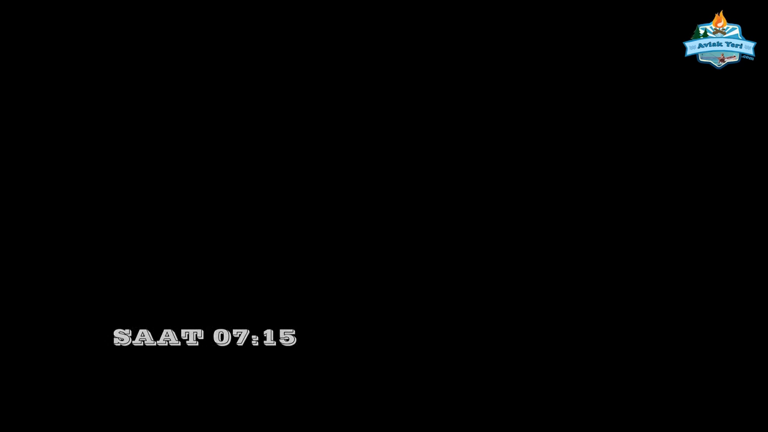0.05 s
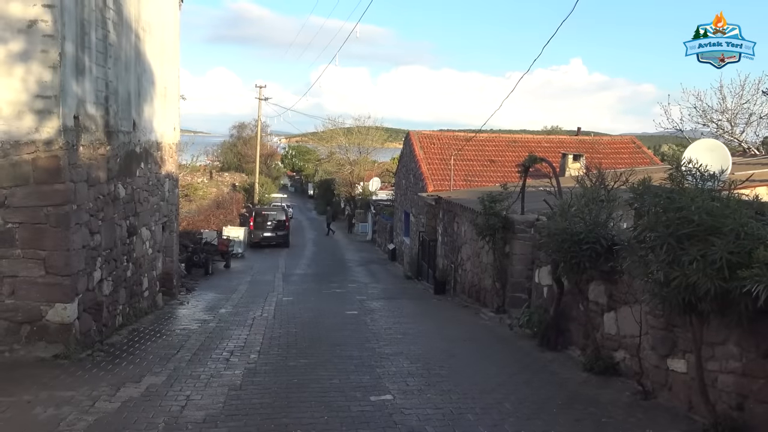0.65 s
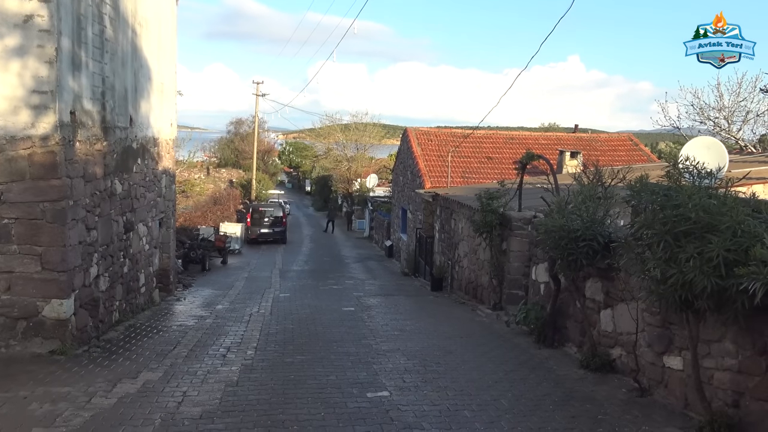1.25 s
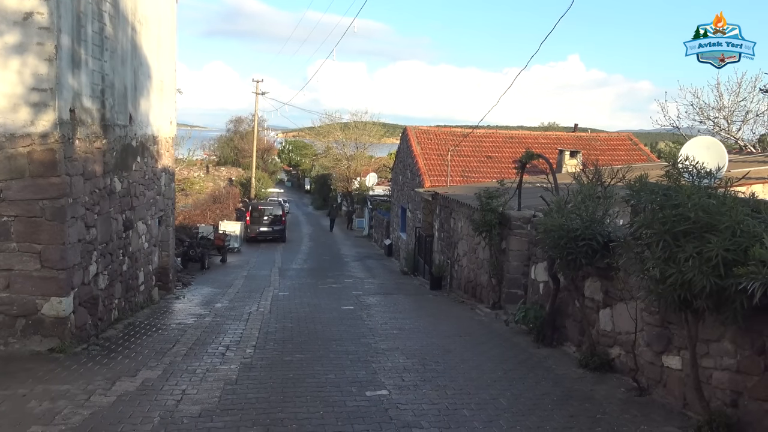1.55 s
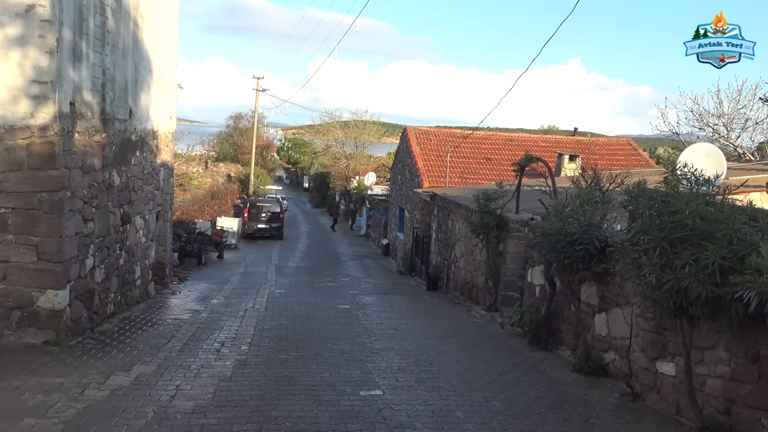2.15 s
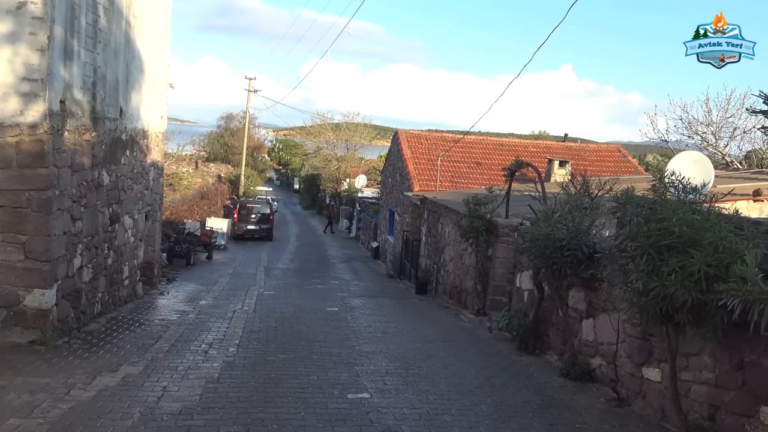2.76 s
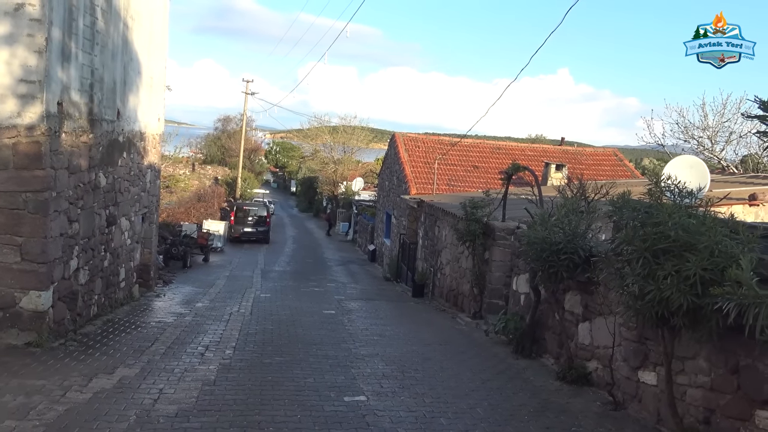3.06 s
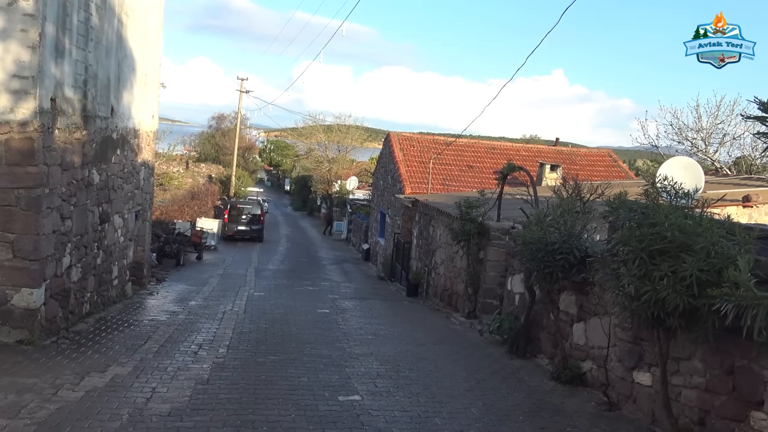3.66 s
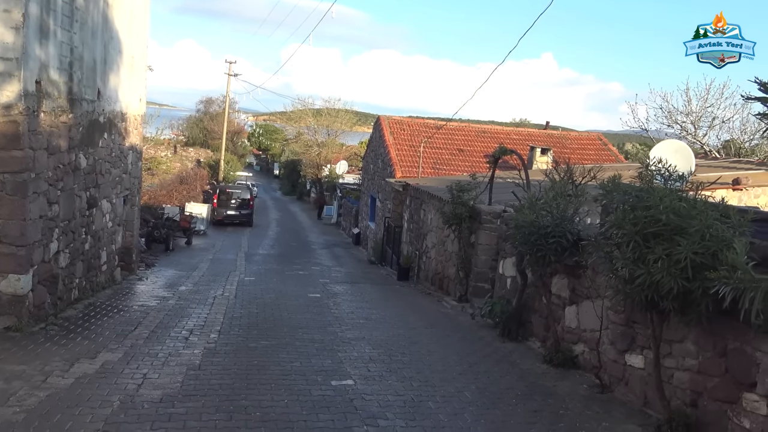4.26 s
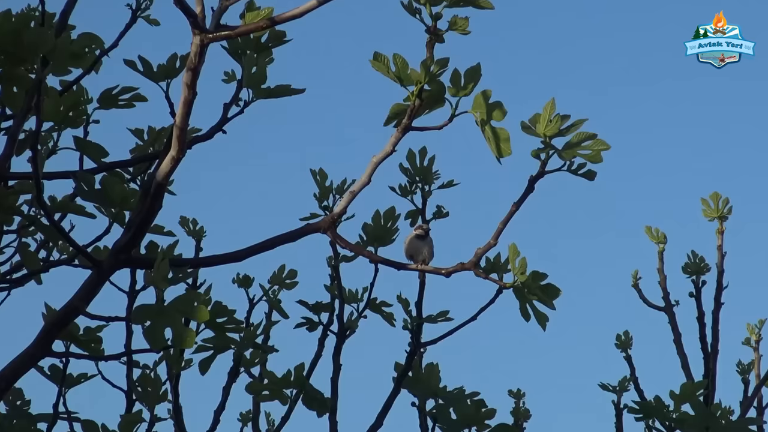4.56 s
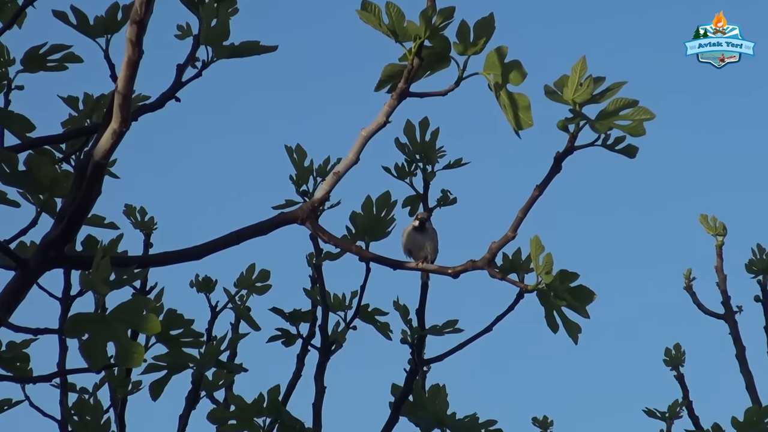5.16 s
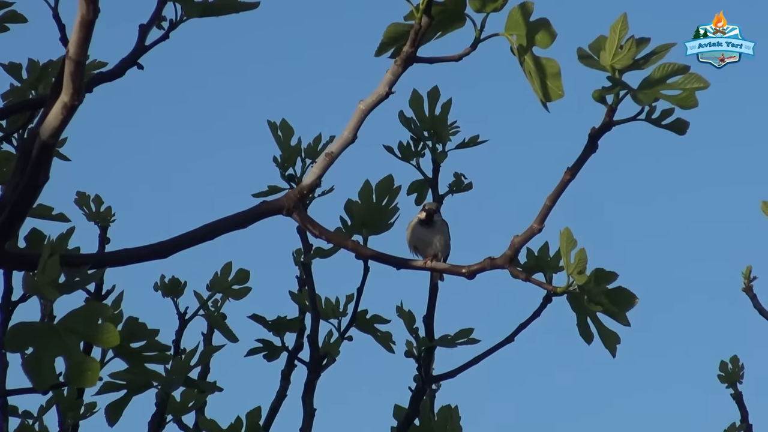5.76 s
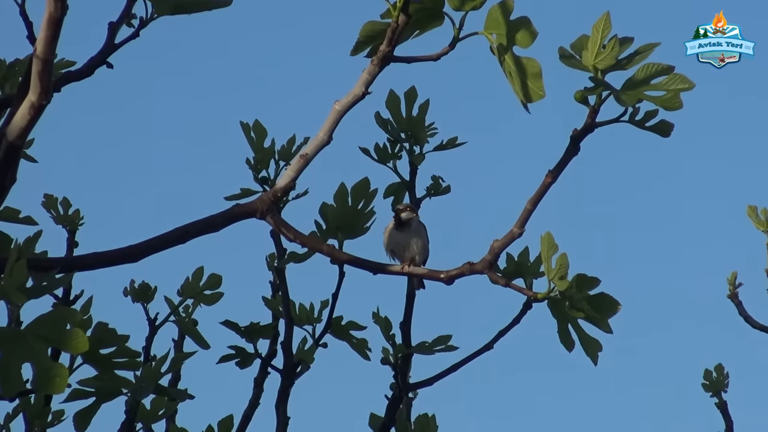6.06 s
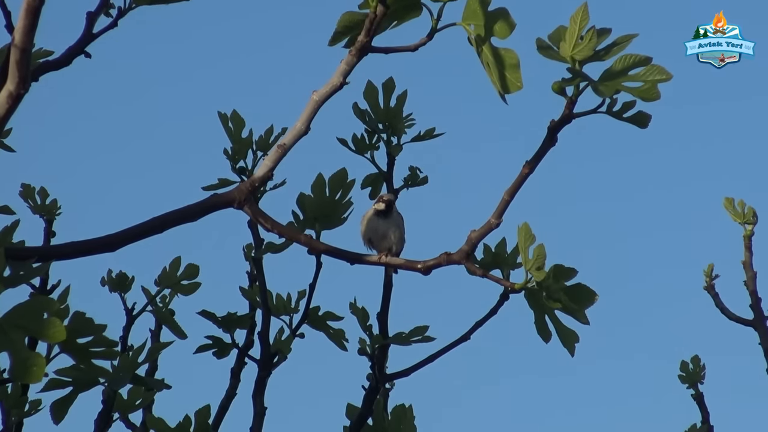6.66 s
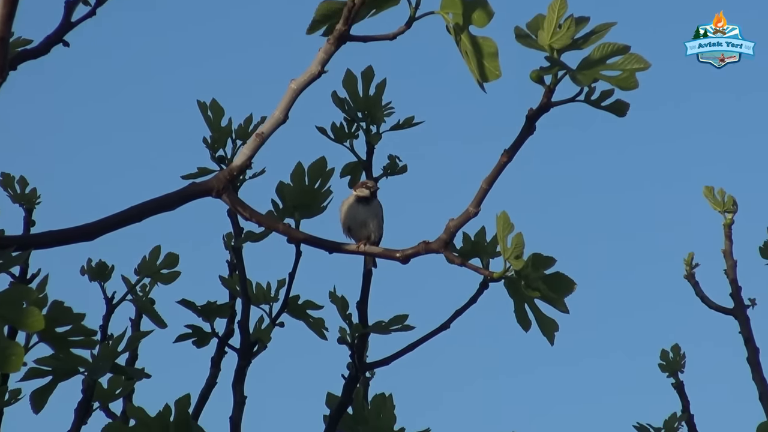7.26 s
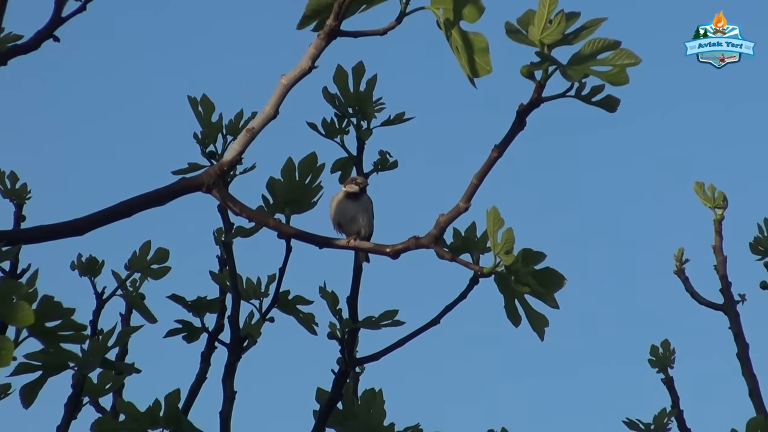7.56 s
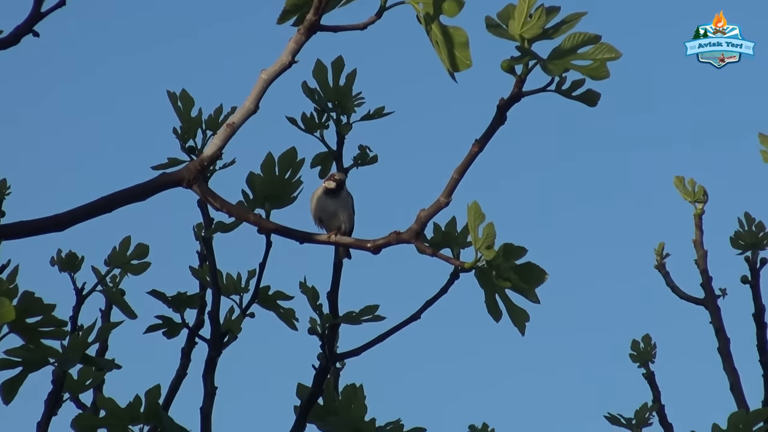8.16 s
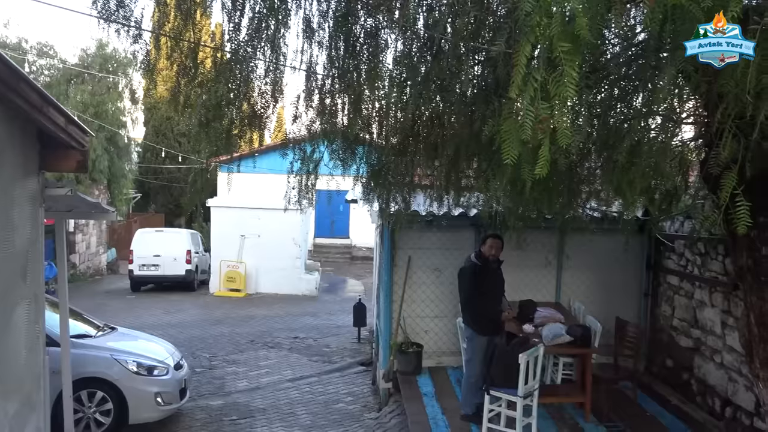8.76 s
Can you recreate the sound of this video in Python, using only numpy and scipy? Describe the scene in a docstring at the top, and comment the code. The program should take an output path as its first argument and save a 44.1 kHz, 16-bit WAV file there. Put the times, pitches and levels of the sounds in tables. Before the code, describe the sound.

A sparrow scolds in quick, harsh chirps between stone walls, joined by mellow dove coos and faint buzzing calls from distant birds. After an abrupt change midway the doves are gone, and sparrows in a tree trade bright cheeps and thin squeals while an engine hums low and far away. Faint outdoor hiss runs throughout, and wind brushes the microphone once near the end.

```python
"""A sparrow scolds in a stone village lane while collared doves coo and far birds wheeze and twitter.
At 4.6 s the morning scene cuts to a fig tree: sparrows cheep over the drone of a distant engine,
with a few ticks and one puff of wind on the microphone. Sparrow notes are arched whistles roughened
by buzz and rasp, coos are nearly pure tones, wheezes are trilled whistles in hiss, and the engine
is a stack of low harmonics. Walls and roofs give the birds a short echo and a tail."""
import sys
import numpy as np
from scipy import signal
from scipy.fft import rfft, irfft, next_fast_len
from scipy.io import wavfile

SR = 44100
rng = np.random.default_rng(int(sys.argv[2]) if len(sys.argv) > 2 else 0)


def int16_out(signal):
    """Quantize to a 16-bit WAV file."""
    q = np.round(np.clip(np.atleast_2d(signal).T, -1, 1) * 32767)
    wavfile.write(sys.argv[1], SR, q.astype(np.int16))


N = 388521
T = np.arange(N) / SR
CUT_S = 4.6  # from the lane to the fig tree
CHEST_HZ, COO_RISE_S = 553, 0.0945
COO_START, COO_END, BREAK_END = .89, .89, .74  # shares of a hoot's top pitch
BREAK_DB, BREAK_OVERLAP_S = -8, 0.011  # a dove's upper voice is softer and overlaps its chest voice

# Colour of the air bed in each place: (frequency [Hz], relative level [dB])
LANE_AIR_COLOUR = [(15, -36), (25, -10), (46, 1), (80, -4), (119, -0.5), (148, -5), (183, -5.5),
                   (378, -13.5), (469, -14), (614, -10), (722, -17.5), (1110, -11), (1300, -24.5),
                   (4870, -19), (6920, -29.5), (15500, -38)]
TREE_AIR_COLOUR = [(15, -35), (25, -16), (50, -1.5), (95, -2), (349, -16.5), (762, -21), (895, -22.5),
                   (1110, -17), (1300, -27.5), (1490, -28), (2490, -30), (3090, -24), (4040, -26),
                   (5880, -34.5), (15500, -47.5)]
# Fader moves of those beds: (time [s], level [dB])
LANE_AIR_FADER = [(.7, -59.5), (1.5, -55), (4.6, -50)]
TREE_AIR_FADER = [(4.602, -44), (5.5, -47.5), (6.5, -45.2), (8.2, -44), (8.8, -42)]
# Colour of a narrow hiss: (frequency [Hz], relative level [dB])
HISS_COLOUR = [(850, -15), (1040, -9.5), (1120, 6), (1190, -13), (1320, -23)]
# Distant engine: (time [s], firing rate [Hz], second order [relative dB], third order [relative dB])
ENGINE_MOVES = [(4.62, 38.0, -47, -42.5), (5.27, 37.35, -44, -55), (5.29, 37.3, -40, -64),
                (5.5, 37.6, -51.5, -47), (6.13, 37.92, -43.5, -55), (6.48, 37.3, -50, -45),
                (6.9, 38.01, -42, -46), (7.25, 37.9, -54, -56), (7.55, 38.0, -43, -42),
                (7.61, 38.0, -53, -46.5), (8.11, 37.26, -38.5, -40.5), (8.19, 38.04, -50, -44.5),
                (8.64, 37.9, -47, -46.5), (8.8, 38.0, -48, -40)]
# Its higher harmonics: (order, relative level [dB])
ENGINE_UPPER_ORDERS = [(4, -54), (5, -57.5), (6, -57), (7, -62.5)]
# Colour of wind on the microphone: (frequency [Hz], relative level [dB])
PUFF_COLOUR = [(25, -11), (50, -0.5), (90, -15), (140, -11), (210, -11.5), (400, -18.5), (900, -27.5),
               (2000, -31), (5000, -47), (9000, -75)]
# Small dry ticks: (time [s], level [dB], centre [Hz], decay [s])
TICK_CUES = [(6.058, -30.5, 2260, .0015), (6.471, -34, 1298, 0.0059), (6.482, -39.5, 1180, 0.027)]
# A far bird's wheezes: (time [s], length [s], level [dB])
WHEEZE_CUES = [(-.1, 0.5, -55.5), (1.587, 0.44, -47), (2.683, 0.42, -44), (3.234, 0.44, -45)]
# Colours of a wheeze's hiss and of its opening squeal: (frequency [Hz], relative level [dB])
WHEEZE_HISS_COLOUR = [(2400, -11), (3100, -9), (3700, 3), (4500, -1.5), (5400, 1.5), (5900, -10),
                      (8000, -20), (10500, -21), (12500, -29)]
WHEEZE_ONSET_COLOUR = [(5200, -23), (6400, 9), (7200, -2.5), (8500, -16), (11000, -8.5), (12500, -30)]
# Plain coos of a near and a far dove: (time [s], length [s], top pitch [Hz], level [dB])
PLAIN_COO_CUES = [(0.381, 0.19, 668, -62.5), (.66, .42, 648, -62.5), (1.035, 0.178, 558, -42.5),
                  (1.299, 0.41, 564, -41), (1.985, .14, 544, -40), (1.99, .22, 660, -58),
                  (2.28, .45, 635, -63), (3.629, .22, 636, -60.5)]
# Coos that break upward: (time [s], delay to the break [s], length [s], upper pitch [Hz],
# chest voice level [dB])
BROKEN_COO_CUES = [(2.496, 0.067, 0.23, 703, -39.5), (2.786, 0.051, .47, 659, -38.5),
                   (3.463, 0.039, .15, 620, -38), (3.939, 0.079, 0.22, 706, -39),
                   (4.222, .05, .5, 665, -38.5)]
# Notes of each sparrow syllable, overlapping when both sides of the syrinx sound: (delay [s], rise [s],
# fall [s], start [Hz], middle [Hz], end [Hz], relative level [dB], roughness); each call transposes them
SYLLABLE_NOTES = { "scold": [(0, 0.0124, 0.023, 5056, 4940, 4750, -8, 0.53),
                  (.002, .038, .022, 2850, 3900, 2400, -1.5, 0.31),
                  (.052, .012, .042, 4297, 4250, 3900, -15.5, .3),
                  (.055, .022, .046, 2447, 2900, 2000, -9.3, 0.21)],
                  "cheep": [(0, 0.018, .018, 6300, 5410, 4900, -21, 1.2),
                  (.022, .015, .026, 3400, 3840, 3020, -5, 0.24),
                  (.052, .006, .012, 3500, 4004, 3130, -6, 0.44),
                  (.058, .006, .022, 4250, 4300, 4000, -13.5, .15),
                  (.065, 0.0119, .047, 2750, 3060, 2448, -2.5, 0.14)],
                  "arch": [(0, 0.0239, 0.0116, 2047, 2500, 2750, -5, 0.22),
                  (.022, .022, .066, 2748, 3945, 2154, 0, 0.48)],
                  "tweet": [(0, .034, 0.0252, 3100, 4100, 3800, -1, 0.24)],
                  "chirp": [(0, 0.01994, .024, 4860, 4910, 4720, -10, .9),
                  (.005, .032, 0.0202, 3295, 4050, 2800, -1, 0.36),
                  (.056, .022, .044, 2800, 3080, 2250, -6.5, .18)],
                  "chip": [(0, .023, .015, 3000, 5250, 4070, 3, 0.3)],
                  "slur": [(0, .024, 0.024, 2610, 3990, 3100, -1.5, .35),
                  (.035, .03, .035, 3450, 3047, 2750, -1, .1),
                  (.09, .02, .045, 2750, 2250, 2000, -13.5, .1)],
                  "squeak": [(0, .03, .022, 5700, 6150, 5520, -3, 0.47),
                  (.052, .034, .035, 5720, 7350, 6220, -7, 0.84)],
                  "squeal": [(0, .038, .03, 6400, 8450, 7340, -7.5, 0.86),
                  (.01, .055, .035, 2800, 4370, 3440, -.5, 0.7),
                  (.045, .035, .028, 8000, 6700, 5200, 0, .8)],
                  "shout": [(0, .07, .026, 5900, 6810, 7600, -18.5, 1.3),
                  (.02, .05, 0.035, 4450, 4200, 3630, -19, .9),
                  (.03, .082, .028, 2200, 3455, 2980, -18.5, 0.24),
                  (.079, .022, .03, 4104, 5360, 4290, -3, 0.46),
                  (.112, .018, 0.018, 4450, 4200, 3750, -6, 0.33),
                  (.142, 0.0159, .018, 4400, 5200, 4600, -10, .33),
                  (.15, 0.0202, 0.027, 3390, 3670, 3900, -13, 0.22),
                  (.168, .014, .033, 4700, 4950, 3150, -8, 0.36)],
                  "chord": [(0, .04, .055, 2900, 3350, 2596, -3.5, .18),
                  (0, .035, .05, 3800, 4150, 3550, -2.5, .27), (.02, .035, .035, 7700, 7100, 5800, -15, .4),
                  (.08, .025, .022, 5800, 5200, 4890, -8.5, 1)], }
# Timbre of each syllable: (half-pitch line [dB], buzz depth, buzz rate [Hz],
# lag of loudness behind pitch [s], note start [relative dB], note end [relative dB])
SYLLABLE_VOICES = {"scold": (-17, 2.9, 480.5, .001, -20.5, -13), "cheep": (-37, 1.14, 491, 0, -12, -18),
                   "arch": (-29, 2, 309.5, 0, -6, -11), "tweet": (-16, .8, 522, .002, -11, -18),
                   "slur": (-48, 1, 400, .001, -15, -14), "squeak": (-16.5, 0.5, 260, 0.2, -6, -10),
                   "squeal": (-27, 1.1, 451, 0.3, -12, -13), "shout": (-40, 1.0, 332, 0.1, -12, -11.5),
                   "chord": (-34, 0.7, 330, 0.1, -13, -9), "chip": (-19, .6, 370, .001, -12, -22),
                   "chirp": (-16.5, 1.5, 450.5, .001, -16, -15.5)}
# Sparrow calls in each place: (time [s], syllable, pitch [ratio], level [dB], left minus right [dB])
LANE_SPARROW_CUES = [(.350, "scold", .97, -29, 0), (.582, "scold", 1.023, -26, 0.2),
                     (1.615, "scold", 1.016, -25, 0.5), (1.838, "scold", 1.02, -23.5, 0),
                     (2.056, "scold", 1.013, -20, 0), (2.425, "tweet", 1.1, -52, 0),
                     (2.545, "tweet", 1.15, -44.5, 0), (3.025, "tweet", 0.71, -54, 0),
                     (3.100, "tweet", 0.68, -54, 0), (3.560, "tweet", .76, -51.5, 0),
                     (3.800, "chip", 1.15, -57.5, 0), (3.895, "tweet", .97, -47, 0),
                     (4.085, "chip", 1.23, -56.5, 0), (4.185, "chip", 1.02, -54, 0),
                     (4.330, "chip", .92, -55.5, 0), (4.584, "scold", 0.95, -21, 1.5)]
TREE_SPARROW_CUES = [(4.666, "cheep", .97, -23, 4.5), (4.826, "squeal", .97, -31.5, 1),
                     (4.895, "squeak", .97, -33, 5.5), (5.036, "arch", .94, -39, -1),
                     (5.245, "tweet", .93, -46.5, -4), (5.372, "chip", 0.96, -56.5, -2),
                     (5.485, "chip", 0.76, -48.5, -1), (5.580, "chip", 1.03, -53.5, -3),
                     (5.752, "chirp", .92, -35, -3), (5.828, "chirp", .89, -34, 1.5),
                     (6.095, "arch", 1, -36.5, 0.5), (6.255, "tweet", 1.02, -39, -2),
                     (6.500, "cheep", 1, -23, 3.5), (6.652, "tweet", 1.034, -37.5, -1),
                     (6.810, "shout", 1, -15.3, 1.5), (7.168, "squeak", 1.014, -35, 6.5),
                     (7.186, "chirp", 1.03, -32, -1.5), (7.389, "chirp", 1.004, -32.3, -3),
                     (7.480, "tweet", 1.19, -44.5, -4), (7.578, "tweet", 1.18, -45.5, -3),
                     (7.663, "cheep", 1.013, -23, 3.5), (7.820, "arch", 1.03, -34.5, .5),
                     (8.070, "tweet", 0.96, -43.5, -4), (8.296, "chip", .76, -44, -2),
                     (8.355, "cheep", 1.01, -23, 3.5), (8.488, "chord", 1, -33.5, 1),
                     (8.662, "slur", 1.004, -28, 1), (8.690, "squeak", 0.99, -33.5, 5)]


def undb(db):
    """Decibels to gain."""
    return 10 ** (np.asarray(db) / 20)


def curve(rows):
    """The columns of a table, joined by straight lines in time."""
    times, *columns = np.transpose(rows)
    return [np.interp(T, times, column) for column in columns]


def phase_of(hz):
    """Running phase of a gliding pitch."""
    return 2 * np.pi * np.cumsum(hz) / SR


def wander(rate, size=N):
    """Smooth random drift of spread 1 that changes about rate times a second."""
    place = np.arange(size) * rate / SR
    points = rng.standard_normal(int(place[-1]) + 4)
    fine = signal.resample_poly(points, 8, 1)
    return np.interp(place, np.arange(len(fine)) / 8, fine)


def coloured(colour, size=N):
    """Noise of rms 1, shaped by (frequency [Hz], relative level [dB]) points."""
    hz, db = np.transpose(colour)
    padded = next_fast_len(size)
    bins = np.maximum(np.fft.rfftfreq(padded, 1 / SR), 1)
    gain = undb(np.interp(np.log(bins), np.log(hz), db, left=-90, right=-90))
    noise = irfft(rfft(rng.standard_normal(padded)) * gain, padded)[:size]
    return noise / noise.std()


def pan(x, pan_db):
    """Place a sound by its level, left minus right."""
    return x * undb(np.array([[pan_db], [-pan_db]]) / 2)


def diffuse(colour, side_db, pan_db, mono_below_hz=500):
    """Noise from all around; two close microphones get the same bass."""
    side = signal.lfilter(*signal.butter(1, mono_below_hz, "high", fs=SR), coloured(colour))
    return pan(coloured(colour), pan_db) + undb(side_db) * side * np.array([[1], [-1]])


def add(track, s, sound):
    """Mix a sound in at a time."""
    start = max(int(s * SR), 0)
    part = sound[..., :max(N - start, 0)]
    track[..., start:start + part.shape[-1]] += part


def arch(t, top_s, length):
    """How far a note is from its turning point: the rise runs from 1 to 0, then the fall from 0 to 1."""
    top_s = np.clip(top_s, .002, length - .002)
    return np.clip(1 - t / top_s, 0, 1), np.clip((t - top_s) / (length - top_s), 0, 1)


def fades(t, length, edge_s):
    """Straight fade-in and fade-out."""
    return np.clip(np.minimum(t, length - t) / edge_s, 0, 1)


def outdoors(x, echo_s, echo_db, tail_db, t60_s, damp_hz, side_db=-9):
    """A rough wall answers once; roofs and stones scatter a dull tail."""
    t = np.arange(int(.7 * SR)) / SR
    mid, side = rng.standard_normal((2, len(t)))
    wide = mid + undb(side_db) * side * np.array([[1], [-1]])
    scatter = signal.lfilter(*signal.butter(1, damp_hz, fs=SR), wide)
    tail = scatter * np.minimum(t / 0.014, 1) * undb(-60 * t / t60_s)
    echo = scatter * np.exp(-np.abs(t - echo_s) / 0.0011)
    response = sum(undb(db) * part / np.sqrt(np.sum(part ** 2) / 2)
                   for part, db in ((tail, tail_db), (echo, echo_db)))
    return x + signal.fftconvolve(x, response, axes=1)[:, :N]


def air(colour, fader, side_db, pan_db, chatter_db=4.0, band_hz=800):
    """A bed of far rumble and soft hiss; bands in the birds' range flicker with distant chatter."""
    bed = diffuse(colour, side_db, pan_db)
    for low_hz in range(2600, 5800, band_hz):
        bandpass = signal.butter(2, [low_hz, low_hz + band_hz], "band", fs=SR, output="sos")
        bed = bed + signal.sosfiltfilt(bandpass, bed) * (undb(chatter_db * wander(22)) - 1)
    return bed * undb(curve(fader)[0] + .5 * wander(5.04))


def narrow_hiss():
    """A faint band of noise near 1.1 kHz that fades up and then holds."""
    fade_up = undb(np.interp(T, [0, 3], [-6, 0]))
    return undb(-60.5) * diffuse(HISS_COLOUR, side_db=-21, pan_db=-6.5) * fade_up


def engine():
    """Low harmonics of a distant engine's firing rate, wavering on the way."""
    firing_hz, second_db, third_db = curve(ENGINE_MOVES)
    phase = phase_of(firing_hz)
    orders = [(2, second_db), (3, third_db)] + ENGINE_UPPER_ORDERS
    drone = sum(undb(db + 1.5 * wander(7.6)) * np.sin(order * (phase + 0.064 * wander(6)))
                for order, db in orders)
    return pan(np.sqrt(2) * undb(-1.1) * drone, 5.4)


def wind_puff(s=8.11, width_s=0.046, db=-33.5):
    """Wind brushes the microphone once: a short, bassy swell."""
    swell = undb(db) * np.exp(-.5 * ((T - s) / width_s) ** 2)
    return swell * diffuse(PUFF_COLOUR, side_db=-16, pan_db=0)


def ticks():
    """Brief knocks: bursts of noise that die at once."""
    out, t = np.zeros(N), np.arange(SR // 10) / SR
    for s, db, hz, decay_s in TICK_CUES:
        burst = coloured([(hz / 8, -8), (hz, 0), (hz * 2, -10), (hz * 5, -28)], len(t))
        add(out, s, undb(db) * np.exp(-t / decay_s) * burst)
    return pan(out, 0.97)


def far_flock(start_s, end_s, db, pitch, count):
    """Far sparrows twitter at random, washed in reflections from walls and roofs."""
    names = ("tweet", "chip", "arch", "chip")
    calls = []
    for i, (when, high, far) in enumerate(rng.random((count, 3))):
        s = start_s + (end_s - start_s) * (i + when) / count
        calls.append((s, names[i % len(names)], pitch * (.85 + .35 * high), db - 6 * far, 0))
    return outdoors(sparrows(calls), echo_s=.045, echo_db=-5.5, tail_db=-4.5, t60_s=0.56, damp_hz=6000)


def wheezes(onset_db=-8, onset_s=0.03, trill_hz=75, whistle_hz=4450, sweep=0.159):
    """A far bird's hoarse buzz: a thin squeal, then a fast-trilled whistle blurred by distance."""
    swell = sum(undb(db) * np.interp((T - s) / length, [0, .15, .55, 1], [0, 1, 1, 0])
                for s, length, db in WHEEZE_CUES)
    onset = sum(undb(db + onset_db) * np.exp(-.5 * ((T - s - .035) / onset_s) ** 2)
                for s, _, db in WHEEZE_CUES)
    trill = np.sin(phase_of(trill_hz * (1 + .23 * wander(40))))
    hz = whistle_hz * (1 + sweep * trill + .03 * wander(150))
    whistle = undb(-8.5) * swell * np.sqrt(2) * np.sin(phase_of(hz))
    voice = outdoors(pan(whistle, 0), echo_s=.03, echo_db=-6, tail_db=-4, t60_s=.4, damp_hz=8000)
    hiss = undb(-1) * swell * diffuse(WHEEZE_HISS_COLOUR, side_db=-21, pan_db=0)
    squeal = onset * diffuse(WHEEZE_ONSET_COLOUR, side_db=-13, pan_db=-1)
    return (voice + (hiss + squeal) * (1 + .2 * trill)) * undb(1.3 * wander(45))


def hoot(length, top_s, top_hz, end_share, db, start_db=-16, end_db=-8):
    """A dove's nearly pure tone rises quickly to its top and sags as it fades."""
    t = np.arange(int(length * SR)) / SR
    rise, fall = arch(t, top_s, length)
    hz = top_hz * (1 - (1 - COO_START) * rise ** 2 - (1 - end_share) * fall ** 2.1)
    phase = phase_of(hz * (1 + 0.0026 * wander(53, len(t))))
    swell = undb(db + start_db * rise ** 2 + end_db * fall ** 2 + 0.25 * wander(25, len(t)))
    tone = np.sin(phase) + undb(-32) * np.sin(2 * phase)
    return np.sqrt(2) * tone * swell * fades(t, length, edge_s=0.012)


def doves(rise_share=.45, chest_rise_share=0.78, leap_s=.008):
    """Plain coos are one hoot; broken coos leap from the chest voice to a higher, sinking one."""
    out = np.zeros(N)
    for s, length, top_hz, db in PLAIN_COO_CUES:
        add(out, s, hoot(length, min(COO_RISE_S, rise_share * length), top_hz, COO_END, db))
    for s, break_s, length, upper_hz, db in BROKEN_COO_CUES:
        chest_s = break_s + BREAK_OVERLAP_S
        add(out, s, hoot(chest_s, chest_rise_share * chest_s, CHEST_HZ, 0.98, db, end_db=-3))
        add(out, s + break_s, hoot(length - break_s, leap_s, upper_hz, BREAK_END, db + BREAK_DB))
    return pan(out, .45)


def syrinx_note(shape, voice, ratio, breath_db, bend=.8, rasp_hz=1100, jitter=0.0188):
    """One side of a sparrow's syrinx: an arched whistle, shaken by a fast buzz and random rasp."""
    rise_s, fall_s, start_hz, middle_hz, end_hz, db, rough = shape
    half_db, buzz_depth, buzz_hz, lag_s, start_db, end_db = voice
    length = rise_s + fall_s
    size = int(length * SR)
    t = np.arange(size) / SR
    rise, fall = ((1 - np.cos(np.pi * bend * x)) / (1 - np.cos(np.pi * bend))
                  for x in arch(t, rise_s, length))
    hz = middle_hz + (start_hz - middle_hz) * rise + (end_hz - middle_hz) * fall
    # effort peaks up to lag_s after the pitch turns; the voice is loudest and roughest there
    before, after = arch(t, rise_s + lag_s, length)
    swell = undb(db + start_db * before ** 2 + end_db * after ** 2) * fades(t, length, edge_s=0.0046)
    rough = rough * (1 - 0.22 * (before + after))
    phase = phase_of(ratio * hz * (1 + jitter * wander(200.5, size)))
    # the buzz puts regular sidebands around the whistle; the rasp smears it into a band
    shake = phase_of(buzz_hz * (1 + 0.036 * wander(99.0, size)))
    depth = rough * buzz_depth
    buzz = (1 + .5 * depth * np.cos(shake)) * np.exp(1j * depth * np.sin(shake))
    rasp = wander(rasp_hz, size) + 1j * wander(rasp_hz, size) + rough * wander(3 * rasp_hz, size)
    whistle = np.exp(1j * phase) * (buzz + rough * rasp) / np.sqrt(1 + 2 * rough ** 2)
    overtones = undb(-26) * np.exp(1j * phase) + undb(-36) * np.exp(2j * phase) * (hz < SR / 8)
    # alternate cycles differ a little, which adds lines at half and one and a half times the pitch
    half_lines = np.exp(1j * phase / 2) + 0.54 * np.exp(3j * phase / 2)
    tone = whistle * (1 + overtones) + undb(half_db) * (1 + 0.4 * np.cos(shake)) * half_lines
    breath = undb(breath_db) * rough * coloured([(1200, -17), (4000, 14), (11000, 5), (16000, -8)], size)
    return np.sqrt(2) * (np.imag(tone) + breath) * swell


def sparrows(calls, breath_db=-24):
    """Each call sounds the notes of its syllable, transposed and panned."""
    out = np.zeros((2, N))
    for s, name, ratio, db, pan_db in calls:
        for delay_s, *shape in SYLLABLE_NOTES[name]:
            note = syrinx_note(shape, SYLLABLE_VOICES[name], ratio, breath_db)
            add(out, s + delay_s, pan(undb(db) * note, pan_db))
    return out


def scene():
    """The lane, then a hard cut to the fig tree; the narrow hiss runs under both."""
    lane = outdoors(sparrows(LANE_SPARROW_CUES, breath_db=-12.5),
                    echo_s=0.0327, echo_db=-16, tail_db=-9.5, t60_s=0.34, damp_hz=11160)
    lane += outdoors(doves(), echo_s=0.0436, echo_db=-41, tail_db=-19, t60_s=0.58, damp_hz=3040)
    lane += far_flock(0.76, 1.8, db=-67.5, pitch=1, count=10)
    lane += far_flock(2.0, 4.5, db=-58.5, pitch=0.96, count=24)
    lane += wheezes() + air(LANE_AIR_COLOUR, LANE_AIR_FADER, side_db=-15.5, pan_db=2)
    tree = outdoors(sparrows(TREE_SPARROW_CUES, breath_db=-16.0),
                    echo_s=0.0146, echo_db=-12, tail_db=-12.5, t60_s=0.42, damp_hz=9100, side_db=-11)
    tree += far_flock(4.2, 8.7, db=-56.5, pitch=0.96, count=28)
    tree += ticks() + engine() + wind_puff()
    tree += air(TREE_AIR_COLOUR, TREE_AIR_FADER, side_db=-12.5, pan_db=1)
    return np.where(T < CUT_S, lane, tree) + narrow_hiss()


def record(dry):
    """A steep low-pass takes off the top above 15.8 kHz."""
    return signal.sosfilt(signal.ellip(10, .2, 70, 15800, fs=SR, output="sos"), dry)


dry = scene()
out = record(dry)
int16_out(out)
```